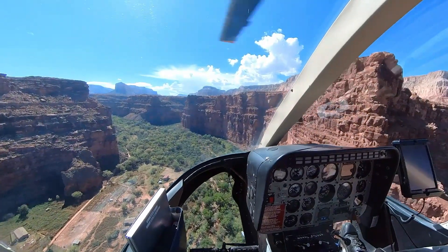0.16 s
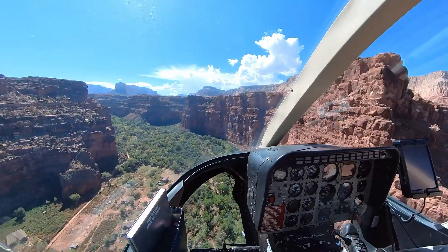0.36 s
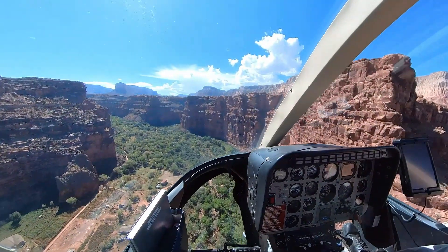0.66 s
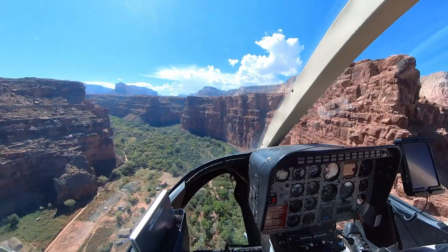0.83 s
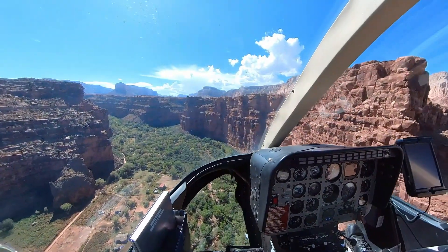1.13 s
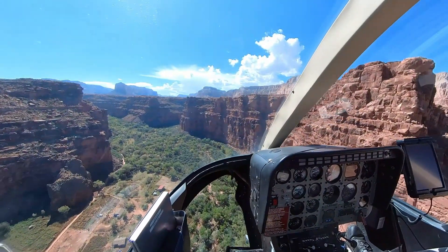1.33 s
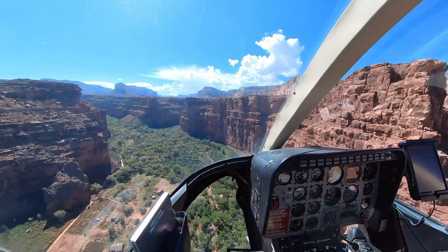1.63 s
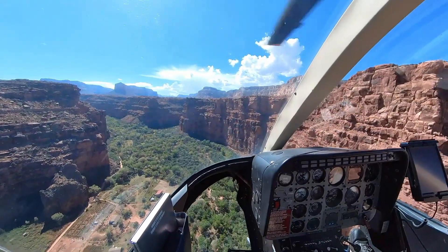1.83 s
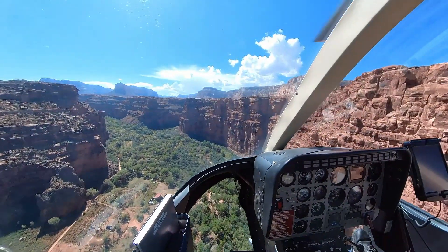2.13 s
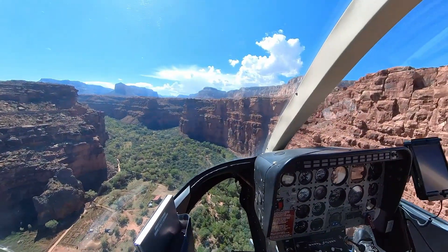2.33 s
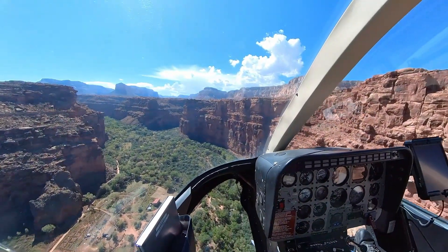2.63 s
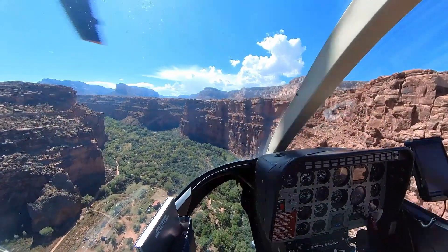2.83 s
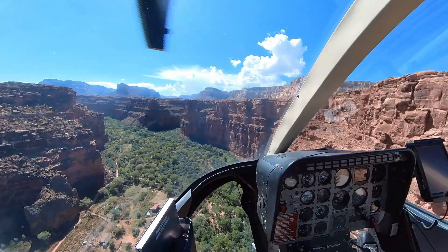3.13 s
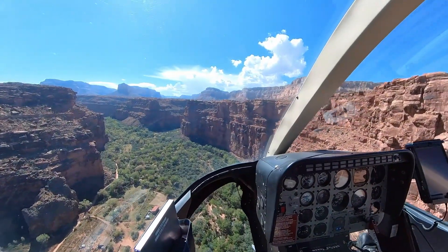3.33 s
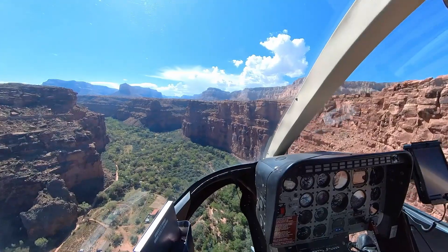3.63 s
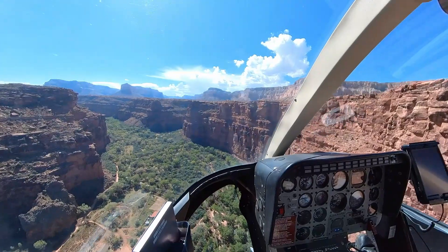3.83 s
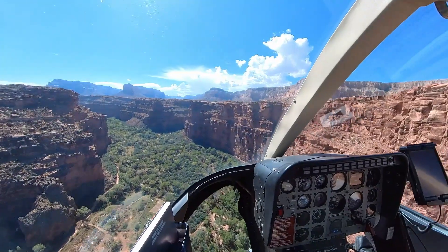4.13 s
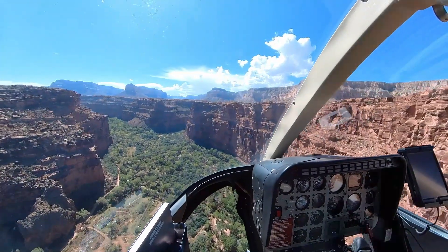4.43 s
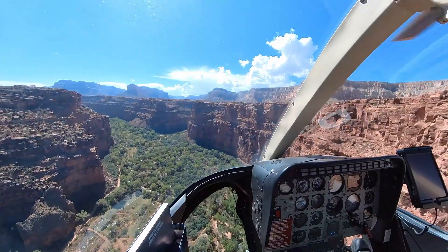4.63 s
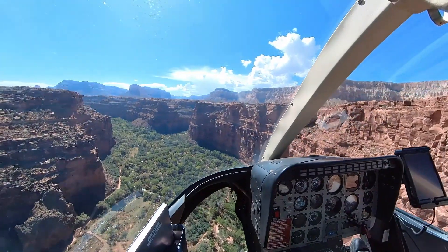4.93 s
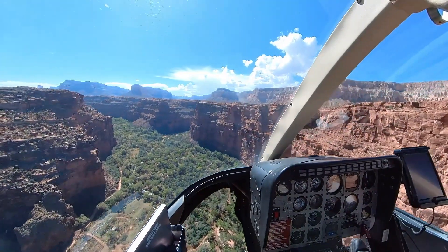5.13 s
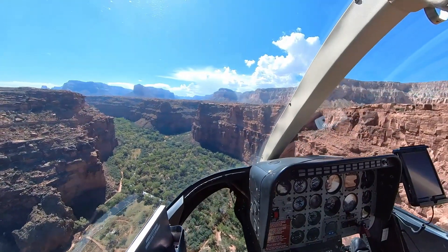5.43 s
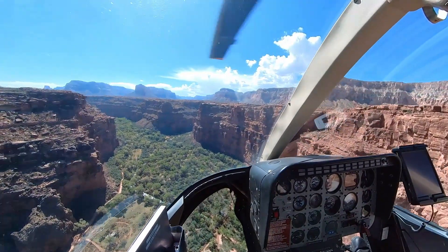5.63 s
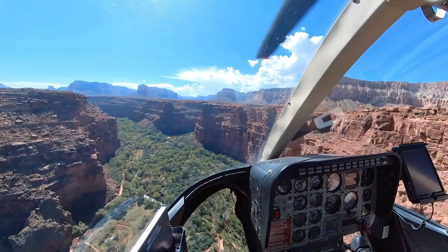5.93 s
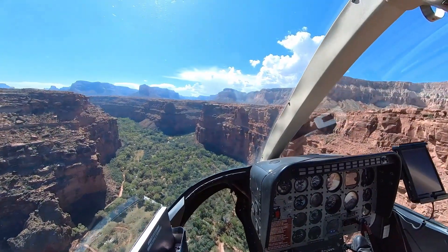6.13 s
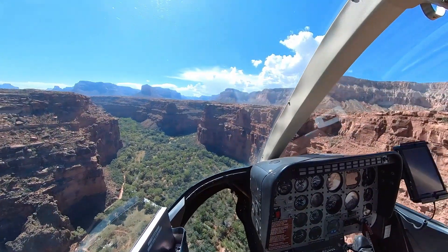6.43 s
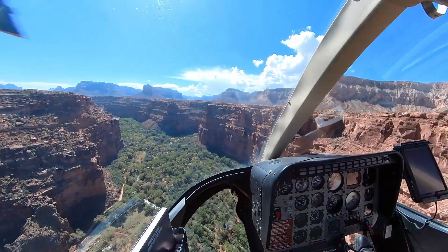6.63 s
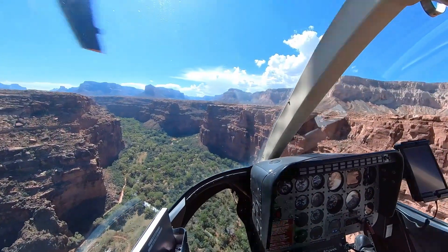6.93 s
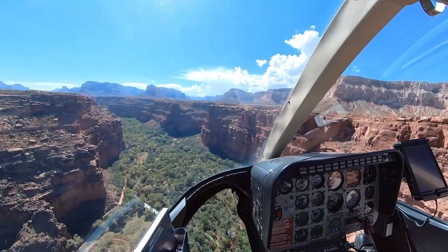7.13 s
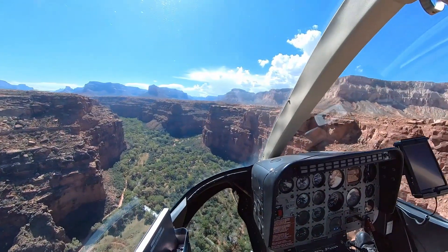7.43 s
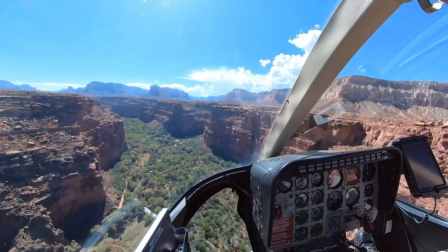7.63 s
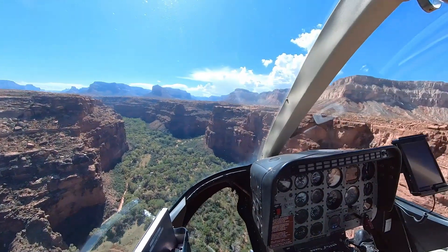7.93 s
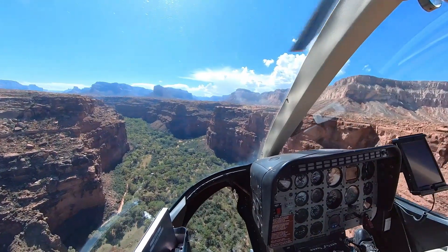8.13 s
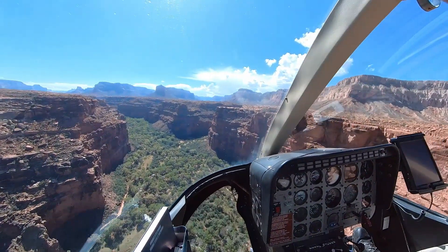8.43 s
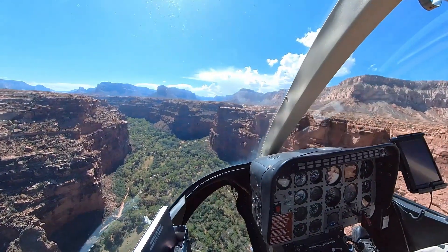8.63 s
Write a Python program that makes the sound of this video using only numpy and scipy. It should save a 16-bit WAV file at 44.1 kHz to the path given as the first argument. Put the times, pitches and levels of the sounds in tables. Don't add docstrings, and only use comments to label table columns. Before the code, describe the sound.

A continuous cabin drone of a turbine helicopter: fast blade thuds and swishes, constant high whine, wind roar, the chop turning sharper midway in a bank.

```python
import sys
import numpy as np
from scipy import signal
from scipy.fft import rfft, irfft
from scipy.io import wavfile
from scipy.ndimage import uniform_filter1d, map_coordinates

SR = 44100
rng = np.random.default_rng(int(sys.argv[2]) if len(sys.argv) > 2 else 0)


def store_wav(level_fs):
    pcm = np.round(np.clip(np.atleast_2d(level_fs), -1, 1) * 32767)
    wavfile.write(sys.argv[1], SR, pcm.T.astype(np.int16))


def linear_from_db(decibels):
    return 10 ** (np.asarray(decibels, float) / 20)


N = 386757


def curves(rows):
    s, *cols = np.transpose(rows)
    return [np.interp(np.arange(N) / SR, s, c) for c in cols]


def wobble(rate):
    knots = rng.standard_normal(int(N * rate / SR) + 4)
    return map_coordinates(knots, [np.arange(N) * rate / SR])


def banked(level_db, banked_db, bank):
    return level_db + (banked_db - level_db) * bank


def tone(turns, db, unsteady_db):
    return np.sqrt(2) * linear_from_db(db + unsteady_db * wobble(5)) * np.cos(2 * np.pi * turns)


def rotor():
    # t/s, blade passes/Hz
    governor = [(0, 13.163), (1.0, 13.157), (1.35, 13.163), (2.0, 13.164), (2.6, 13.154), (3.9, 13.1535),
                (4.35, 13.164), (5.0, 13.171), (6.0, 13.1505), (6.95, 13.147), (7.6, 13.1495),
                (8.5, 13.159), (8.77, 13.159)]
    return np.cumsum(curves(governor)[0]) / SR


def thump(blade, bank):
    # multiple of blade rate, level/dB rms, banked level/dB rms, wander/dB
    moving = [(2, -32.5, -33, 0.2), (3, -27.5, -37, 1.55), (4, -35.5, -31, 1.7), (5, -39, -36.5, -1.4),
              (6, -39.5, -50, 0), (7, -39.5, -49, -0.3)]
    # multiple of blade rate, level/dB rms
    steady = [(1, -48), (8, -49), (9, -49)]
    levels = [(k, banked(level_db, banked_db, bank) + wander_db * wobble(1.5))
              for k, level_db, banked_db, wander_db in moving]
    total = np.zeros(N)
    for k, db in levels + list(steady):
        if k > 4:
            lead = .2 * (k - 3.5) + .15 * bank * (k == 5)
        else:
            lead = -.11 * max(k - 2, 0) ** 2 * bank
        turns = k * (blade - .42) + lead
        total += tone(turns + .006 * k * wobble(1.5), db, unsteady_db=.6)
    return total


def family(table, ratio, blade, unsteady_db, swell={}, kind={}):
    total = np.zeros(N)
    beat = np.exp(2j * np.pi * (blade - .22))
    for multiple, db, above_db, below_db in table:
        turns = multiple * ratio * blade + rng.random()
        sides = linear_from_db(above_db - db) * beat + linear_from_db(below_db - db) / beat
        shake = 1 + np.exp(1j * np.pi * kind.get(multiple, -.3)) * sides
        level = np.sqrt(2) * linear_from_db(db + swell.get(multiple, 0) + unsteady_db * wobble(4))
        total += level * np.real(shake * np.exp(2j * np.pi * turns))
    return total


def tail_rotor(blade, common_db, bank, cruise_hz):
    tail_tones = [(1, -51.5, -51.5, -58.4), (2, -31.8, -49.1, -52.8), (3, -47.1, -70.8, -70.3),
                  (4, -50.1, -71.8, -70.1), (5, -62.9, -78.9, -73.5), (6, -59.0, -75.5, -73.1),
                  (7, -61.5, -70.5, -77.6), (8, -64.6, -72.2, -79.1), (20, -67.4, -91.7, -88.5)]
    blades_db = banked(-0.9, 1.26, bank)
    gear_db = banked(-3, 0.5, bank) + 1.6 * common_db + 1.5 * wobble(1.7)
    swell = {2: blades_db, 20: gear_db}
    return family(tail_tones, 85.157 / cruise_hz, blade, unsteady_db=0.4, swell=swell)


def drive_shaft(blade, cruise_hz):
    shaft_tones = [(1, -33.2, -43.2, -53.4), (2, -42.3, -63.0, -56.4), (3, -58.8, -68.8, -71.6),
                   (19, -58.5, -69.6, -68.1), (20, -77.0, -89.0, -81.5), (21, -72.5, -86.2, -86.8)]
    # t/s, level/dB
    torque = [
        (0, -3.5),
        (1.8, 2),
        (2.5, -2),
        (3.5, 3),
        (4.5, 4),
        (5.5, -1),
        (6.5, 0),
        (7, -5),
        (8.77, -1.5),
    ]
    torque_db, = curves(torque)
    return family(shaft_tones, 100.18 / cruise_hz, blade, unsteady_db=0.74, swell={19: torque_db})


def drive_train(blade, roar_db, common_db, bank):
    cruise_hz = 13.1572
    gear_tones = [(37.5, -61.6, -80.5, -80.9), (49, -48.2, -60.7, -62.1), (75, -57.3, -85.6, -75.3),
                  (98, -68.9, -74.2, -83.5), (112.5, -66.1, -86.4, -83.7), (148, -64.7, -77.9, -69.6),
                  (150, -73.1, -94.4, -77.9), (187.5, -78.5, -97.4, -96.0), (198, -76.1, -87.7, -81.8),
                  (225, -77.9, -97.6, -97.5), (100, -72.8, -93, -93)]
    gear_shake = {49: -.58, 148: 0}
    # f/Hz at cruise speed, level/dB rms
    pump_tones = [(194.8, -47.5), (215.9, -51.8), (282, -59.0), (385.7, -67.7), (749.9, -70.1),
                  (763.1, -66.2), (766.3, -67.0), (858.2, -68.3), (1296, -75.5), (1877.1, -75.3),
                  (1900, -73.0), (1906.5, -77.2)]
    tail = tail_rotor(blade, common_db, bank, cruise_hz)
    shaft = linear_from_db(0.02) * drive_shaft(blade, cruise_hz)
    gears = family(gear_tones, 1, blade, unsteady_db=.5, kind=gear_shake)
    gears = linear_from_db(0.16 + 0.42 * roar_db) * gears
    pumps = sum(tone(hz / cruise_hz * blade + rng.random(), db, unsteady_db=2.0) for hz, db in pump_tones)
    return tail + shaft + gears + linear_from_db(0.3) * pumps


def turbine():
    # t/s, turns/Hz, whine level/dB
    spool = [
        (0, 828.4, 0),
        (1, 828.4, -1),
        (2.8, 828.4, -2),
        (3.6, 829.6, -1),
        (4.3, 829.6, -.5),
        (5.9, 828.2, 0),
        (6.6, 828.6, 2),
        (7.2, 830.3, 1),
        (8.77, 831.3, 3),
    ]
    whine = [(1, -54), (2, -76), (8, -77), (9.31, -92), (10, -98)]
    speed_hz, level_db = curves(spool)
    turns = np.cumsum(speed_hz + .15 * wobble(6)) / SR
    return linear_from_db(level_db + .1) * sum(tone(k * turns, db, unsteady_db=.8) for k, db in whine)


def noise(spectrum, lo_hz, hi_hz, patchy_db):
    z = signal.stft(rng.standard_normal(N + 8192), nperseg=1024)[2]
    field = uniform_filter1d(rng.standard_normal(z.shape), 10, 0)
    field = uniform_filter1d(field, 5, 1)
    white = signal.istft(z * linear_from_db(patchy_db * field / field.std()), nperseg=1024)[1]
    hz = np.fft.rfftfreq(len(white), 1 / SR) + 1e-3
    f, db = np.transpose(spectrum)
    gain = linear_from_db(np.interp(np.log(hz), np.log(f), db, right=-160)) * np.sqrt(SR / 2)
    above_lo = np.clip(.5 + 4 * np.log(hz / lo_hz), 0, 1)
    above_hi = np.clip(.5 + 4 * np.log(hz / hi_hz), 0, 1)
    gain *= np.sqrt(above_lo * (1 - above_hi))
    return irfft(rfft(white / white.std()) * gain, len(white))[:N]


def sweep(turns, rise, fade, scatter_db):
    part = turns % 1
    strength_db = scatter_db * rng.standard_normal(int(turns.max()) + 2)[turns.astype(int)]
    return linear_from_db(strength_db) ** 2 * (1 - np.exp(-(part / rise) ** 3)) * np.exp(-(part / fade) ** 2)


def swish(blade, wake, lead, swish_db):
    # f/Hz, density/dB per Hz
    blade_air = [(1150, -87), (1640, -88.5), (2240, -89.5), (3400, -91), (4200, -90.5), (5200, -91),
                 (6000, -91.5), (6400, -93), (7000, -97), (7500, -101.0), (8100, -107.4), (8700, -116.2),
                 (9300, -127.4)]
    even_db, uneven_db = .7, 1.8
    crack = wake * sweep(blade + 1 + lead, rise=.055, fade=.2, scatter_db=uneven_db)
    bright = 2.01 * sweep(blade + 1.006, rise=0.13, fade=0.32, scatter_db=even_db) + 1.3 * crack
    dull = 1.4 * sweep(blade + 1.06, rise=0.2, fade=0.43, scatter_db=even_db) + .45 * crack
    layers = np.sqrt(bright) * noise(blade_air, 2900, 20000, patchy_db=1.0)
    layers = layers + np.sqrt(dull) * noise(blade_air, 1000, 2900, patchy_db=1.5)
    return linear_from_db(swish_db + 1.2 * wobble(70)) * layers


def airflow(roar_db, hiss_db):
    # f/Hz, density/dB per Hz
    hull = [(14, -68), (22, -62), (32, -50.5), (42, -53), (60, -50), (85, -53), (130, -54), (180, -57.5),
            (222, -55.5), (245, -65), (275, -64), (330, -67), (400, -72.5), (470, -71)]
    panels = [(400, -72), (470, -73.5), (560, -75), (600, -72), (700, -72), (785, -73.5), (815, -79),
              (880, -78), (975, -78.5), (1010, -82.5), (1150, -85.0), (1310, -84.5), (1345, -91),
              (1450, -82.5)]
    slipstream = [(1380, -84), (1640, -87), (2240, -89.5), (2800, -92.5), (3400, -94), (4200, -97),
                  (5200, -97), (6000, -99.4), (6400, -101.2), (7000, -105.9), (7500, -109.9),
                  (8100, -116.5), (8700, -124.1), (9300, -132.9)]
    rumble = linear_from_db(0.92 * wobble(3) + .5 * roar_db) * noise(hull, 5, 432, patchy_db=0.64)
    roar = noise(panels, 423, 1410, patchy_db=0.94) + noise(slipstream, 1360, 2700, patchy_db=1.36)
    hiss = linear_from_db(0.65 * hiss_db) * noise(slipstream, 2700, 20000, patchy_db=0.65)
    return rumble + linear_from_db(roar_db) * roar + hiss


def scene():
    # t/s, crack power ratio, lead/turns, bank 0-1 (turn of the thump shape)
    wake_path = [
        (0, .1, .08, 0),
        (4, .2, .09, .1),
        (4.8, .9, .11, .9),
        (5.9, 1.1, .13, .95),
        (6.8, 1, .17, .95),
        (7.6, 1.3, .23, .95),
        (8.1, .6, .18, .95),
        (8.77, .15, .1, .95),
    ]
    # t/s, common level/dB
    common_level = [(0, -0.6), (.42, 1.1), (.6, -1.8), (1.15, -1.8), (1.4, 0.7), (1.7, -1.1), (2.2, 0),
                    (2.65, -1.8), (2.92, -3.5), (3.2, -1.6), (3.7, 0), (4.4, -1.5), (5.4, 0.46), (6.35, 2.6),
                    (6.65, -0.1), (6.9, 1.7), (7.2, 0), (8.77, 1.5)]
    blade = rotor()
    wake, lead, bank = curves(wake_path)
    common_db, = curves(common_level)
    roar_db = .95 * common_db + 1.2 * bank - .6 * wake + .4 * wobble(4.4) - 0.3
    swish_db = 1.05 * common_db - 2.5 * bank + 1.9 * wake + .4 * wobble(4.4) + .4
    hiss_db = 0.73 * common_db + 1.4 * bank + .1 * wake + .6 * wobble(4.4) - 1.6
    machine = thump(blade, bank) + drive_train(blade, roar_db, common_db, bank) + turbine()
    return (machine + swish(blade, wake, lead, swish_db) + airflow(roar_db, hiss_db))[None]


def roll_off(x):
    return signal.sosfilt(signal.butter(12, 9060, fs=SR, output="sos"), x)


def record(dry):
    low_cut = signal.butter(3, 36, "high", fs=SR, output="sos")
    filter_off = np.clip((np.arange(N) / SR - .43) / .05, 0, 1)
    filtered = linear_from_db(1.2) * signal.sosfiltfilt(low_cut, dry)
    heard = filter_off * dry + (1 - filter_off) * filtered
    heard = heard / (1 + np.abs(heard / .27) ** 5) ** (1 / 5)
    return roll_off(heard)


dry = scene()
out = record(dry)
store_wav(out)
```